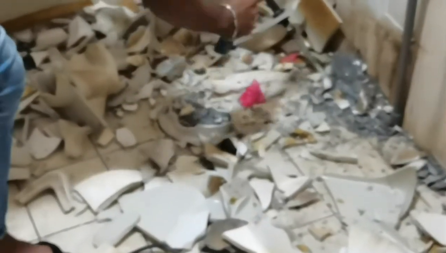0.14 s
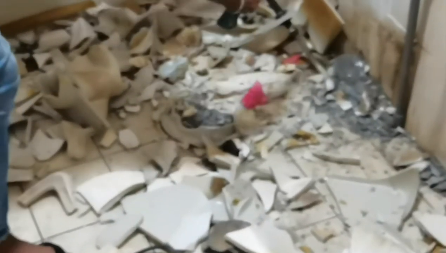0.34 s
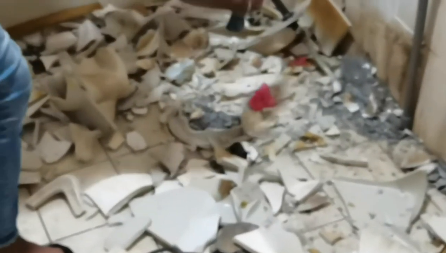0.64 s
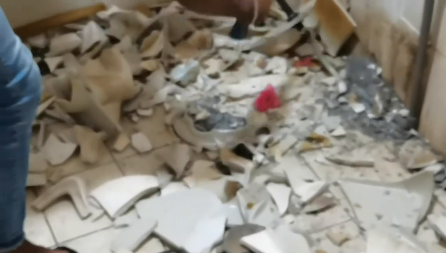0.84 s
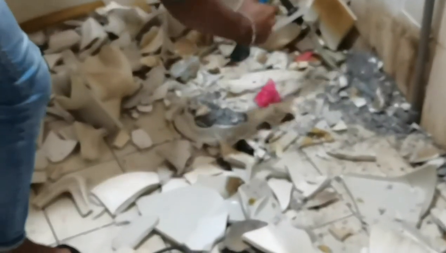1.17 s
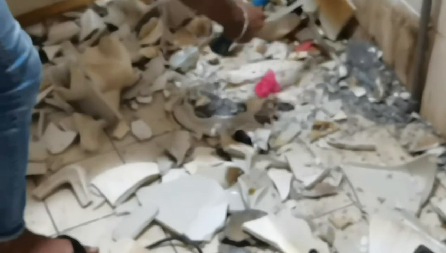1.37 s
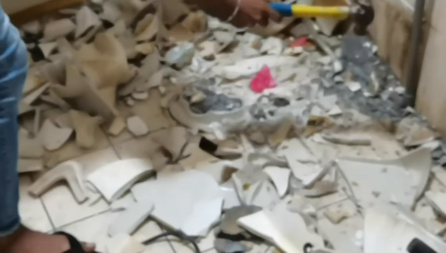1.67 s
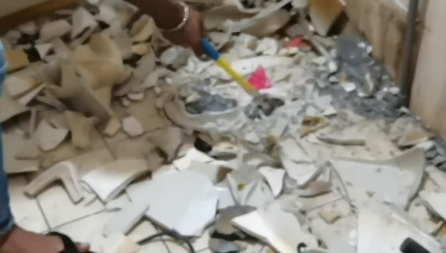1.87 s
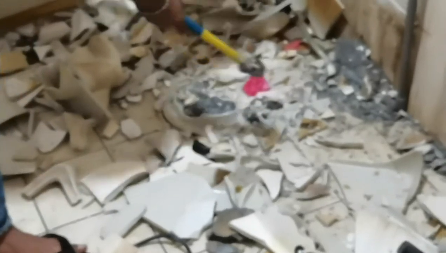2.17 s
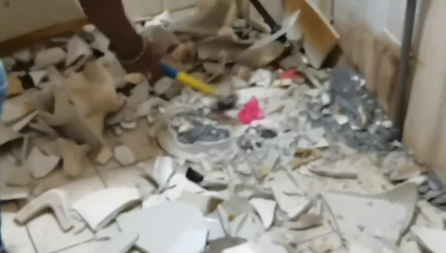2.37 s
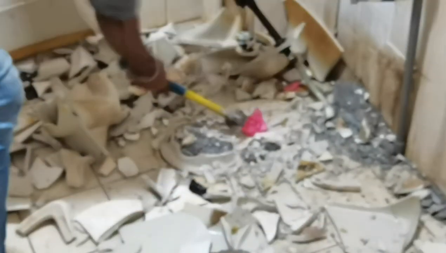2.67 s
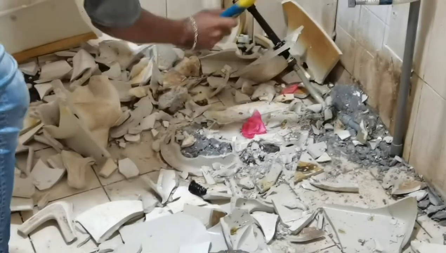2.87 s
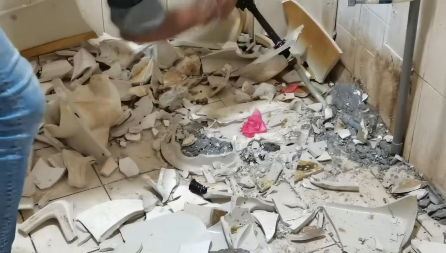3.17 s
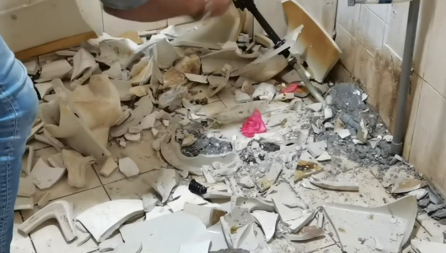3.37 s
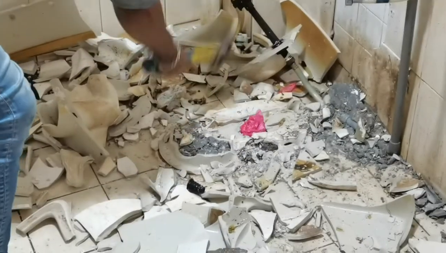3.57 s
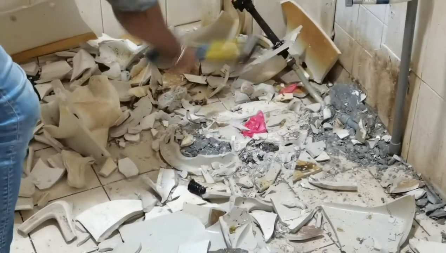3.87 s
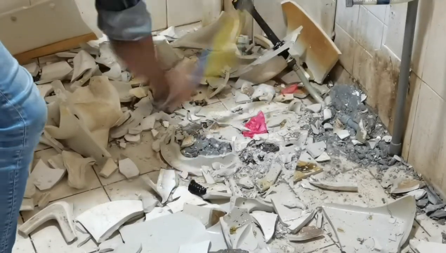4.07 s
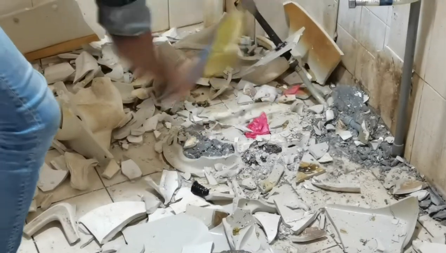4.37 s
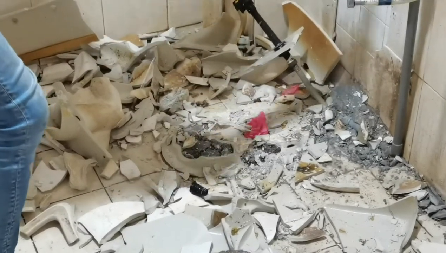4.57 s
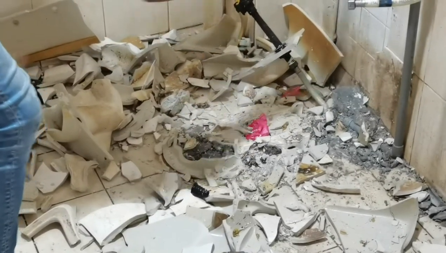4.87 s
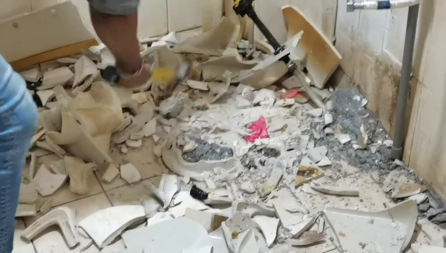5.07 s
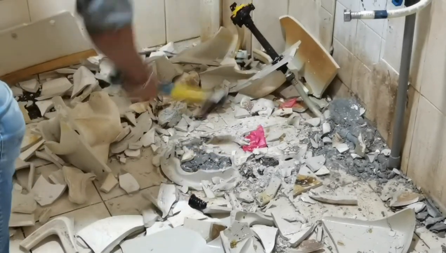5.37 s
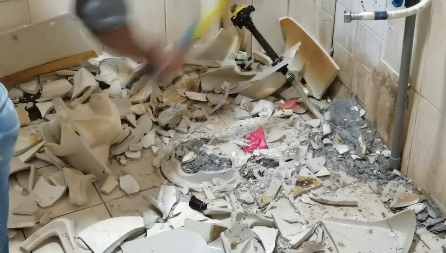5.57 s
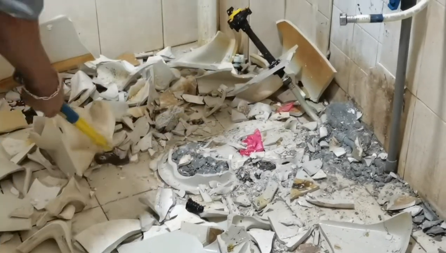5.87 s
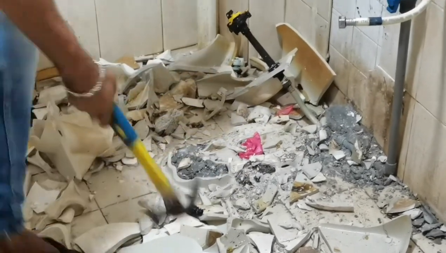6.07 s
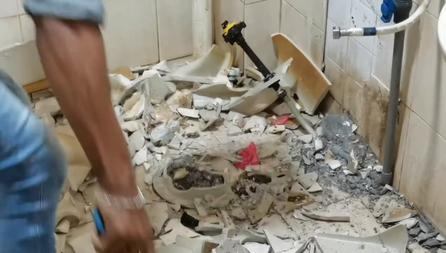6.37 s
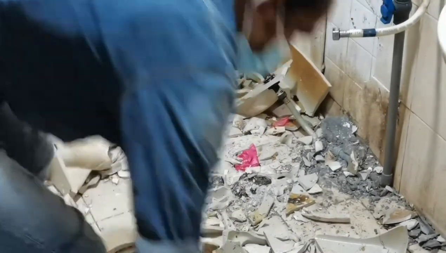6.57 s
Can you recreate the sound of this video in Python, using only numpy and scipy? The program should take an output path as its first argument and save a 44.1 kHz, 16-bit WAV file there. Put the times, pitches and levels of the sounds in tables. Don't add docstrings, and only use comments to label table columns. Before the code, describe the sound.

A steel hammer smashes ceramic on a tiled bathroom floor in quick steady blows, shards cracking, clinking and skittering between hits.

```python
import sys
import numpy as np
from scipy import signal
from scipy.fft import rfft, irfft, next_fast_len
from scipy.io import wavfile
from scipy.ndimage import map_coordinates

SR = 44100
rng = np.random.default_rng(int(sys.argv[2]) if len(sys.argv) > 2 else 0)


def dump_mix(stems):
    frames = np.atleast_2d(stems).T
    limited = np.clip(frames, -1, 1)
    pcm = np.round(limited * 32767).astype(np.int16)
    wavfile.write(sys.argv[1], SR, pcm)


def invert_db(level):
    return 10 ** (np.asarray(level, dtype=float) / 20)


N = 297222


def shape(x, points, lo_hz=0, hi_hz=np.inf, unit=True):
    n = next_fast_len(x.shape[-1] + 4096)
    f = np.maximum(np.arange(n // 2 + 1) * SR / n, 1)
    hz, db = np.transpose(points)
    gain = invert_db(np.interp(np.log(f), np.log(hz), db))
    gain = gain / np.sqrt((1 + (lo_hz / f) ** 10) * (1 + (f / hi_hz) ** 10))
    if unit:
        gain = gain / np.sqrt(np.mean(gain ** 2))
    return irfft(rfft(x, n) * gain, n)[..., :x.shape[-1]]


def add(out, s, sound, pan_db):
    i = int(np.clip(s * SR, 0, N))
    out[:, i:i + sound.shape[-1]] += invert_db([[pan_db / 2], [-pan_db / 2]]) * sound[..., :N - i]


def ring(hz, db, t60):
    t = np.arange(int(t60 * SR)) / SR
    onset = 1 - np.exp(-t / 0.001)
    return invert_db(db) * np.sin(2 * np.pi * hz * t) * np.exp(-np.log(1000) * t / t60) * onset


def rings(modes):
    out = np.zeros((2, N))
    for s, hz, db, t60, pan_db in modes:
        add(out, s, ring(hz, db, t60), pan_db)
    return out


# time in seconds, left minus right in dB.
AIM = [(0, 1), (2.1, 2), (2.43, -1.5), (2.72, 0), (3.0, 0), (3.3, 1), (4.6, 3.5), (5.7, 5), (6.74, 5)]


def aim(s):
    return np.interp(s, *np.transpose(AIM))


# frequency in Hz, level in dB per Hz.
AIR = [(18, -27.5), (30, -6.5), (106, 5), (526, -20.5), (1040, -17), (1910, -27), (7670, -36),
       (8980, -54.5), (9970, -33), (14800, -44.5), (16000, -62)]


def room_air():
    return invert_db(-60.0) * shape(rng.standard_normal((2, N)), AIR)


# time in seconds, level in dB, snap width in seconds,
# slow return swing in dB relative to the snap, click level in dB.
TAPS = [(2.222, -9.5, 0.00017, -22, -35), (2.251, -34, 0.0005, 1, -55), (2.269, -9.5, 0.00023, -7, -24.5),
        (2.2773, -10.5, 0.00032, -10, -21), (2.357, -16.5, 0.00052, -11, -46),
        (2.366, -23.5, 0.00022, 1, -37), (2.384, -35, 0.00024, -11, -41), (2.3957, -33, .0003, -9, -39),
        (2.399, -15.5, 0.00031, -8, -24), (2.416, -36, 0.00043, -12, -42), (2.4461, -18, 0.00038, -11, -20),
        (5.243, -30, 0.0004, -6, -63), (6.202, -24.5, 0.00033, -5, -51), (6.407, -39.5, 0.00043, -6, -66)]
# start in seconds, length in seconds, rumble in dB, scrape in dB.
STROKES = [
    (2.272, 0.038, -30, -50),
    (2.299, 0.016, -20, -32),
    (2.308, 0.016, -29, -23.5),
    (2.383, 0.024, -37, -48),
    (2.459, 0.049, -43, -66),
]


def finger():
    t = np.arange(N) / SR
    near = np.arange(-400, 900) / SR
    click_s, slip_s = 0.0014, 0.0021
    press_db_s, lift_db_s = 3500, 3500
    taps = np.zeros((2, N))
    for s, db, snap, lobe_db, click_db in TAPS:
        u = near / snap
        push = invert_db(db) * (invert_db(lobe_db) * np.exp(-((u - 4) / 3) ** 2) - np.exp(-u ** 2))
        click = invert_db(click_db) * np.exp(-np.abs(near) / click_s)
        add(taps, s + near[0], np.array([push, click]), 0)
    s, length, rumble_db, scrape_db = np.transpose(STROKES)[..., None]
    before, after = np.minimum(t - s, 0), np.maximum(t - s - length, 0)
    press = invert_db(press_db_s * before - lift_db_s * after)
    rumble = shape(rng.standard_normal(N), [(40, -6), (150, 4.0), (400, -0.5), (900, -14.0), (2000, -42.0)])
    scrape = shape(rng.standard_normal(N), [(300, -41), (1200, 5.5), (3000, -3.5), (8000, -8.5),
                                            (9000, -51.5), (10000, -10.0), (15000, -25.0)])
    rumbling = sum(invert_db(rumble_db) * press) * rumble
    scraping = np.roll(sum(invert_db(scrape_db) * press), int(slip_s * SR)) * scrape
    return taps[0] + taps[1] * scrape + rumbling + scraping


# frequency in Hz, t60 in seconds.
TILES = [(100, 0.12), (260, 0.35), (700, 0.44), (1840, 0.26), (4850, 0.27), (12800, 0.24)]


def bathroom(x, wet_db, build_s=0.00053):
    t = np.arange(int(.7 * SR)) / SR
    hz, t60 = np.transpose(TILES)
    edges = np.r_[0, np.sqrt(hz[1:] * hz[:-1]), np.inf]
    echo = 0
    for lo, hi, decay in zip(edges, edges[1:], t60):
        band = shape(rng.standard_normal((2, len(t))), [(1, 0), (SR, 0)], lo, hi, unit=False)
        echo = echo + band * np.exp(-np.log(1000) * t / decay)
    echo = echo * (1 - np.exp(-t / build_s))
    echo = echo * invert_db(wet_db) / np.sqrt(np.sum(echo ** 2, axis=1, keepdims=True))
    echo[:, 0] = invert_db([0.0, -12.0])
    return signal.fftconvolve(x, echo, axes=1)[:, :N]


# start in seconds, crack in dB, then body and splinters
# in dB relative to the crack.
FALLS = [(0.0024, -15.5, -10.5, -11.5), (0.928, -52.5, -7, 17), (1.256, -55, -13, 22),
         (1.412, -12, -33, -3), (1.452, -13, -34, -7), (1.526, -16, -3.5, 5), (1.543, -9, -16, -14),
         (1.599, -15.5, -33.5, -11), (1.649, -29, -27, -1), (1.785, -49.5, -17, 22),
         (2.859, -40.5, -3, 14.5), (2.891, -27.5, -21, 4.5), (2.965, -33.5, -8, 4), (4.1, -44.5, -13, 8),
         (4.583, -41, -7, 14), (4.804, -14.5, -3, 4.5), (4.895, -18, -40, 3), (5.0486, -29, -13, 10),
         (5.16, -18, -21, 0), (5.222, -40.5, -14, 21), (5.355, -44, 9, 25), (5.713, -9, -23, -0.5),
         (6.649, -23.5, 6, -11)]
# (seconds, dB, dB, dB).
TICKS = [(4.151, -23.5, -5, 7), (4.434, -57, -12, 12), (4.659, -32, 2.5, -20.5), (5.682, -37.5, -9, 10),
         (6.713, -18, -5, -12), (4.723, -42.5, -5, 4.5), (6.628, -30, 14, -5), (5.9, -42, -8, 7),
         (5.94, -53, -8, 12), (6.0, -59, -8, 10), (6.484, -51, 4, -10), (6.218, -28.5, 3, -6)]
# (seconds, dB, dB, dB).
SLIDES = [
    (2.675, -50, 10, -9),
    (6.207, -37, 1, -6.5),
    (6.472, -49, -3, -9),
    (6.555, -49, -9, 0),
    (6.59, -55, -11, 4),
]
RUBBLE_PAN_DB = 1


def loose():
    kinds = (FALLS, .012), (TICKS, .004), (SLIDES, .035)
    return [(*row, length) for rows, length in kinds for row in rows]


def chips(s, db, pan_db, spread, count):
    late, pitch, size, side = rng.random((count, 4)).T
    hz = 1800 * 6.5 ** pitch
    t60 = .006 + .03 * size ** 2
    return list(zip(s + spread * late, hz, db - 16 * late - 10 * size, t60, pan_db + 8 * (side - .5)))


# start in seconds, frequency in Hz, level in dB, t60 in seconds.
CLINKS = [(0, 7870, -40, .08), (0, 4200, -36.5, .058), (.842, 11800, -40, .06), (1.409, 6900, -28, .03),
          (1.524, 8200, -33, .05), (1.531, 250, -44, .1), (1.531, 340, -46, .08), (1.531, 170, -48, .1),
          (1.49, 5200, -42, .06), (1.535, 11750, -34, .04), (1.787, 11300, -48, .04),
          (1.79, 10200, -48, .04), (1.598, 3960, -36, .03), (1.607, 11170, -33, .07),
          (1.606, 6080, -33, .04), (1.63, 6010, -40, .05), (1.66, 6040, -42, .05), (2.578, 2050, -52, .04),
          (2.777, 2800, -44, .05), (2.964, 6300, -53.5, .08), (2.965, 8030, -35, .033),
          (2.965, 12580, -50, .05), (3.18, 12100, -53, .1), (3.29, 7634, -24.5, .13),
          (3.309, 7370, -21, .035), (3.995, 9700, -43, .04), (4.012, 7660, -41, .029),
          (4.04, 6350, -50, .03), (4.1, 6520, -54, .06), (4.561, 6330, -41, .044), (4.724, 6100, -52, .04),
          (4.724, 10600, -52, .03), (4.84, 9700, -41, .06), (4.97, 5150, -48, .04), (4.955, 3700, -46, .05),
          (4.975, 8800, -47, .04), (4.66, 2100, -41, .05), (4.659, 3650, -38, .015), (4.66, 1250, -42, .02),
          (4.931, 6960, -41, .04), (4.935, 10910, -36.5, .048), (5.75, 6710, -32, .03),
          (6.165, 10900, -66, .06), (6.166, 6790, -64, .08), (6.72, 5620, -24, .04),
          (6.528, 1300, -56, .04), (6.55, 1190, -55, .04), (6.629, 2480, -31, .02),
          (6.627, 2150, -33, .015), (6.632, 2750, -35, .015), (6.474, 7000, -61, .012),
          (6.484, 3050, -50, .02), (6.29, 3900, -54, .05), (6.325, 11400, -61, .02)]
# start in seconds, frequency in
# Hz, level in dB, t60 in seconds.
MORE_CLINKS = [
    (1.63, 6010, -40, .05),
    (1.66, 6040, -42, .05),
    (4.659, 3650, -38, .015),
    (4.66, 1250, -42, .02),
    (6.55, 1190, -55, .04),
    (6.655, 2500, -36, .03),
    (6.676, 2450, -40, .03),
]
# start in seconds, frequency in Hz, level in dB, t60 in seconds.
STREAKS = [(0.58, 13500, -58, 0.053), (1.433, 10700, -34, 0.044), (1.442, 7440, -35, 0.044),
           (1.462, 10500, -41, 0.049), (1.532, 11710, -37, 0.049), (1.547, 2170, -30, 0.043),
           (1.554, 2860, -43, 0.067), (1.567, 14340, -55, 0.046), (1.602, 14150, -59, 0.06),
           (1.669, 5550, -51, 0.046), (2.771, 2680, -35.5, 0.059), (2.783, 2070, -46, 0.044),
           (2.838, 1910, -49, 0.056), (2.853, 2710, -54.5, 0.046), (2.885, 3450, -55, 0.047),
           (2.893, 4860, -46.5, 0.074), (3.329, 7640, -29.5, 0.06), (3.349, 14380, -53, 0.09),
           (3.372, 12960, -44, 0.047), (3.427, 7700, -48, 0.12), (3.753, 10250, -65, 0.064),
           (3.991, 12960, -47, 0.051), (3.999, 14130, -69, 0.056), (4.028, 10340, -48, 0.063),
           (4.028, 11330, -54, 0.046), (4.49, 13240, -57.5, 0.079), (4.51, 3900, -40.5, 0.044),
           (4.516, 7900, -42.5, 0.047), (4.516, 8720, -43, 0.055), (4.528, 11100, -42.5, 0.09),
           (4.548, 8530, -43.5, 0.055), (4.574, 6500, -49, 0.044), (4.89, 11800, -33, 0.049),
           (4.893, 8460, -42, 0.056), (4.896, 6110, -37, 0.049), (4.896, 7150, -44, 0.044),
           (5.018, 6520, -55.5, 0.051), (5.378, 5560, -29, 0.046), (5.497, 1660, -41.5, 0.05),
           (5.523, 11200, -52, 0.075), (5.813, 4010, -46, 0.046), (5.848, 8980, -53, 0.058),
           (6.086, 5350, -69, 0.082), (6.202, 6800, -60, 0.082), (6.205, 4600, -50, 0.053),
           (6.217, 10190, -58, 0.049), (6.272, 3060, -61, 0.058), (6.623, 5150, -55, 0.061),
           (6.649, 9950, -45, 0.046), (6.704, 1910, -40, 0.044)]
# frequency in Hz, level in dB, t60 in seconds.
SLAB = [(1826, -26, 0.052), (2340, -51, 0.032), (4440, -19.5, 0.033), (6370, -27, 0.054), (7700, -35, .04),
        (10000, -31, 0.044), (10330, -33, 0.044), (12000, -39, .05)]
RIM = [(2210, -26, .03), (2830, -28, 0.055), (5170, -34, 0.023), (11500, -36, 0.05)]
SLIVER = [(2740, -49, .06), (4880, -47, 0.035), (5480, -58.5, .033), (7680, -45, 0.06), (7850, -46, .05),
          (10260, -58.5, .067)]
BOWL = [(1534, -37.5, 0.12), (2076, -39, 0.052), (2750, -46.5, 0.048), (2930, -52, 0.08),
        (3830, -43, 0.055), (7460, -49, 0.05)]
# frequency in Hz, level in dB, t60 in seconds.
FLAKE = [(7800, -55, .03), (10080, -46, .02), (10330, -43, 0.028), (11900, -49, .025)]
BEAD = [(3740, -70, 0.062), (5350, -67, 0.1), (8480, -66, .07), (13400, -58, .03)]
SPLINT = [(9480, -40, 0.076), (11900, -36, .07)]
CRUMB = [(2460, -42.5, 0.037), (4770, -32, .03), (8630, -43.5, 0.054), (11700, -31.5, 0.041)]
CHIP = [(1500, -43, .014), (2600, -42, .01), (3300, -41, .012), (3870, -43, .012), (4600, -42, .012),
        (5200, -44, .01)]
# the modes of the shard, time in seconds, level in dB.
HOPS = [(SLAB, 1.438, -9), (SLAB, 1.443, -4), (SLAB, 1.447, -2), (SLAB, 1.46, -4), (SLAB, 1.49, -15),
        (SLAB, 1.516, -16), (RIM, 1.551, 2), (RIM, 1.563, 0), (RIM, 1.642, -15), (SLIVER, 2.862, -8),
        (SLIVER, 2.888, 0), (SLIVER, 2.9, -6), (SLIVER, 2.966, -7), (CHIP, 4.659, 5), (CHIP, 4.6615, 2),
        (CHIP, 2.893, -8), (CHIP, 6.224, -6), (CRUMB, 4.899, 0), (SPLINT, 4.99, -1), (SPLINT, 5.034, -4),
        (FLAKE, 5.957, 0), (FLAKE, 6.04, -16), (BEAD, 6.081, 0), (BOWL, 6.204, -12), (BOWL, 6.222, 0),
        (BOWL, 6.29, -12)]


def shards():
    modes = []
    for (s, db, *_), (_, _, grit_db) in zip(BLOWS, AFTER):
        modes += chips(s + 0.016, db + grit_db - 4.5, aim(s), 0.18, count=50)
    for s, db, _, _, length in loose():
        modes += chips(s, db - 17.0, aim(s) + RUBBLE_PAN_DB, 5 * length, count=14)
    bounces = [(s, hz, db + drop_db, t60) for shard, s, drop_db in HOPS for hz, db, t60 in shard]
    modes += [(s, hz, db + 6.0, 0.98 * t60, 0) for s, hz, db, t60 in CLINKS + MORE_CLINKS + bounces]
    modes += [(s + .006, hz, db + 6.5, t60, aim(s)) for s, hz, db, t60 in STREAKS]
    return rings(modes)


# head ring in dB,
# upper ring in dB relative to it, grit in dB relative to the crack.
AFTER = [(-19, -33.5, -26), (-20.5, -8.5, -4), (-17, -9, -31), (-35, -14.5, -28.5), (-33, -2, -8),
         (-32, -21, -1), (-15.5, -20, -34), (-24, 5, -38), (-36.5, 18, -13.5), (-53, 2, -13),
         (-11, -25.5, -23.5), (-23.5, 14.5, -8.5), (-31, 0, -18), (-26.5, 12, 0.5), (-23, -8.5, -3),
         (-12.5, 3.5, -1), (-8.5, -16, -17.5), (-15.5, -22.5, -15.5), (-13, 0.5, -6.5), (-35, 4, 12.5),
         (-16, -2, -12)]
# frequency in Hz, level in dB, t60 in seconds.
HEAD = [(4290, 6, 0.045), (4325, -3, 0.2), (4370, -3.5, 0.24), (8160, 1, 0.035), (8190, -20, 0.12)]
# time in seconds, level in dB.
RESTS = [
    (6.162, -54),
    (6.632, -38),
    (6.656, -35),
    (6.685, -39),
]
# frequency in Hz, level in dB relative to the crack,
# time it takes to give way in seconds.
PIECES = [(2210, -2, 0.0026), (2150, -6, 0.00039), (2100, -29, 0.001), (1600, -4, 0.00052),
          (1575, -5, 0.00068), (1755, -6, 0.00099), (1600, -8, 0.0026), (1100, -9.5, 0.0019),
          (2640, -10.5, 0.00092), (1310, -9, 0.00067), (2036, -21, 0.0011), (2420, -4.5, 0.0007),
          (1150, -7.5, 0.002), (1920, -5, 0.00038), (1480, -13, 0.0022), (2020, -18.5, 0.00055),
          (1280, -10.5, 0.0031), (4540, -22.5, 0.0013), (1370, -6.5, 0.00052), (2910, 1, 0.0024),
          (2860, -8, 0.0021)]
# slab ring and boom, both in dB relative to the crack.
FLOORS = [(-25.5, -20), (-13.5, -12.5), (-23.5, -16), (-15, -20.5), (-26, -14), (-18.5, -18),
          (-18.5, -16.5), (-11, -15.5), (-17.5, -20), (-10.5, -12.5), (-19.5, -20.5), (-38, -18.5),
          (-24, -11), (-23, -16), (-20.5, -15.5), (-23.5, -13.5), (-28, -21.5), (-23, -25), (-15, -21),
          (-14.5, -16.5), (-41, -29)]
# frequency in Hz, level in dB, t60 in seconds.
SLAB_RING = [(244, -5.5, 0.12), (265.5, 0, 0.23), (352, -7.5, 0.049)]


def hammer():
    piece_spread, piece_t60_s = .12, 0.017
    modes = []
    strikes = [(s, db, upper_db) for (s, *_), (db, upper_db, _) in zip(BLOWS, AFTER)]
    strikes += [(s, db, -3.0) for s, db in RESTS]
    for s, db, upper_db in strikes:
        detune = 1 + .002 * rng.standard_normal(len(HEAD))
        for (hz, mode_db, t60), extra_db, k in zip(HEAD, (0, 0, 0, upper_db, upper_db), detune):
            modes.append((s, hz * k, db + mode_db + extra_db - 10.5, t60, aim(s)))
    for (s, crack_db, *_), (piece_hz, piece_db, _), (slab_db, _) in zip(BLOWS, PIECES, FLOORS):
        for late, off, long in rng.random((10, 3)):
            hz = piece_hz * (1 + piece_spread * (2 * off - 1))
            modes.append((s + 0.032 * late ** 2, hz, crack_db + piece_db, piece_t60_s * (.5 + long), aim(s)))
        modes += chips(s, crack_db - 8, aim(s), .008, count=24)
        modes += [(s, hz, crack_db + slab_db + mode_db, t60, 0) for hz, mode_db, t60 in SLAB_RING]
    return rings(modes)


def glaze():
    snap_db, snap_s = -0.5, 0.0012
    out, t = np.zeros((2, N)), np.arange(600) / SR
    for s, db, *_, top in BLOWS:
        add(out, s, invert_db(db + top + snap_db) * np.exp(-t / snap_s), aim(s))
    return shape(out * rng.standard_normal((2, N)), COLOUR, EDGES_HZ[-1])


def fracture(length, rise, spiky_db=3.0, touch_db=-15.0):
    t = np.arange(SR // 6) / SR - .003
    snaps = np.repeat(rng.standard_normal((2, len(t) // 24 + 1)), 24, axis=1)[:, :len(t)]
    snaps = invert_db(spiky_db * snaps)
    run = (1 - np.exp(-np.maximum(t, 0) / rise)) * np.exp(-t / np.clip(length, 1e-3, .08))
    touch = invert_db(touch_db) * min(0.0029 / rise, 1)
    even = np.where(t < 0, touch, run) ** 2
    uneven = snaps ** 2 * even
    return 1.79 * uneven * even.sum() / np.sum(uneven, axis=1, keepdims=True)


def rubble():
    patch_db, patch_s, full_hz = 3.2, .04, 2500
    f, t, z = signal.stft(rng.standard_normal((2, N)), SR, nperseg=1024)
    cells = rng.standard_normal((150, int(N / SR / patch_s) + 3))
    patches = map_coordinates(cells, np.meshgrid(np.sqrt(f), t / patch_s, indexing="ij"), order=1)
    depth = patch_db * 1.5 * np.clip(f / full_hz, .45, 1)[:, None]
    gain = invert_db(depth * patches)
    return signal.istft(z * gain / np.sqrt(np.mean(gain ** 2)), SR, nperseg=1024)[1][:, :N]


# start in seconds, crack in dB, then thud, body and splinters in dB relative to the crack.
BLOWS = [(0.0288, -13.5, -12, -0.5, -7.5), (0.2679, -17.5, -7, 1, 0.5), (0.5179, -15.5, -12.5, -3, -4.5),
         (0.7778, -17.5, -8.5, -4.5, -4), (1.0283, -19, -6, 1, 1), (1.286, -17.5, -20.5, -6, -2.5),
         (1.8366, -17, -3, 3, -8), (2.107, -19.5, 2, 1, 1.5), (2.4292, -20.5, 4.5, -13, 6.5),
         (2.72, -21, -10, -13.5, 6.5), (3.0075, -13.5, -12, -3, -11.5), (3.291, -12.5, -15, -7.5, -8),
         (3.568, -14, -13.5, 1, -2.5), (3.861, -16, -12, -6.5, -1.5), (4.159, -16.5, -10, -4, -1),
         (4.45, -16, -6, 2, -9), (4.7487, -12.5, -12, -5, -9), (5.0579, -16, -10, -8, -3),
         (5.381, -18, -1, 1.5, -3), (5.6885, -25.5, -6, 5.5, 5.5), (6.719, -15.5, -26, -15, -19)]
# frequency in Hz, level in dB per Hz.
COLOUR = [(15, -30.5), (25, -17.5), (120, -15), (206, -9.5), (256, -3), (489, -9.5), (1330, 2),
          (3340, -10.5), (4250, -4.5), (4740, -10.5), (7920, -14), (9070, -23), (10400, -15), (14800, -28),
          (16000, -33)]
EDGES_HZ = (130, 520, 2450, 8700)
FADES_S = (0.38, 0.37, 0.4, 0.28, 0.21)


def breaking():
    wet_db, build_s = (0.0, 6.0, 5.0, 3.0, 1.5), 0.0076
    cracks = []
    for (s, db, thud, body, top), (*_, give), (_, boom) in zip(BLOWS, PIECES, FLOORS):
        levels = db + np.array([boom, thud, body, 0, top]) - 2.0
        reach_db = min(-5 - 0.76 * thud, 1.5)
        cracks.append((s, levels, .004, give, invert_db(2 * reach_db), aim(s)))
    for s, db, body, top, length in loose():
        levels = db + np.array([body - 30, body - 11, body, 0, top]) - 17.5
        cracks.append((s, levels, length, 0.17 * length, .4, aim(s) + RUBBLE_PAN_DB))
    power, sent = np.zeros((2, 5, 2, N))
    for s, levels, length, rise, reach, pan in cracks:
        crack = fracture(length, rise)
        for near, far, gain in zip(power, sent, invert_db(2 * levels)):
            add(near, s - .003, gain * crack, 2 * pan)
            add(far, s - .003, reach * gain * crack, 2 * pan)
    noise = rubble()
    edges = (0, *EDGES_HZ, np.inf)
    build = np.exp(-1 / (build_s * SR))
    out = 0
    for near, far, lo, hi, t60, db in zip(power, sent, edges, edges[1:], FADES_S, wet_db):
        fade = np.exp(-2 * np.log(1000) / (t60 * SR))
        echo = signal.lfilter([1 - fade], [1, -fade], far)
        echo = signal.lfilter([1 - build], [1, -build], echo)
        out = out + shape(noise * np.sqrt(near + invert_db(2 * db) * echo), COLOUR, lo, hi)
    return out


# frequency in Hz, left minus right in dB.
PORTS = [(60, 16.5), (200, 4.5), (700, -1.5), (2400, -3), (4400, 3.5), (7500, 2.5), (8300, 20),
         (8900, 16.5), (9500, 17), (11000, 2), (13300, 11), (13900, 27.5)]


def scene():
    left, right = breaking() + bathroom(hammer(), wet_db=-0.5) + bathroom(shards(), wet_db=-4.0) + glaze()
    left = shape(left, [(hz, min(db, 6) / 2) for hz, db in PORTS], unit=False)
    right = shape(right, [(hz, min(db, 6) / 2 - db) for hz, db in PORTS], unit=False)
    return np.array([left, right + finger()]) + room_air()


def top_cut(x):
    return signal.sosfilt(signal.butter(12, 16480, fs=SR, output="sos"), x)


def record(dry):
    rounded = np.tanh(1.326 * dry) / 1.023
    mix = shape(rounded, [(15050, 0.5), (15400, -26), (16400, -38)], unit=False)
    return top_cut(mix)


dry = scene()
out = record(dry)
dump_mix(out)
```